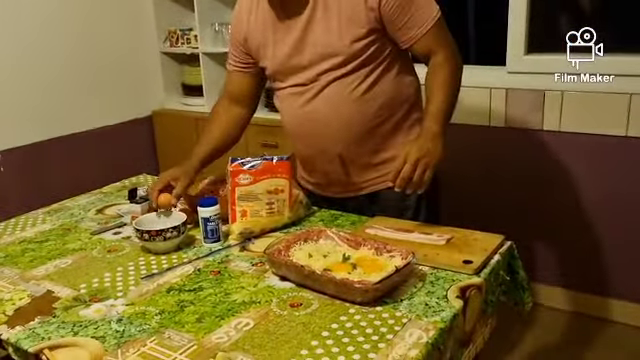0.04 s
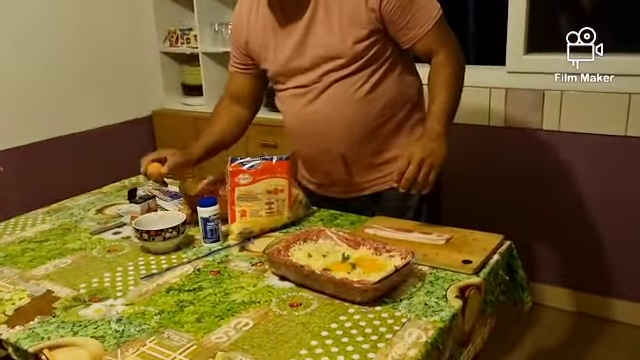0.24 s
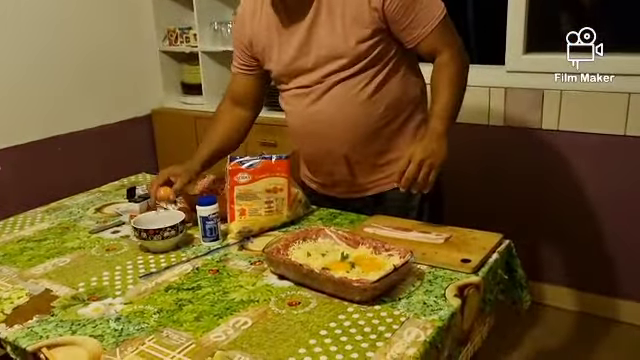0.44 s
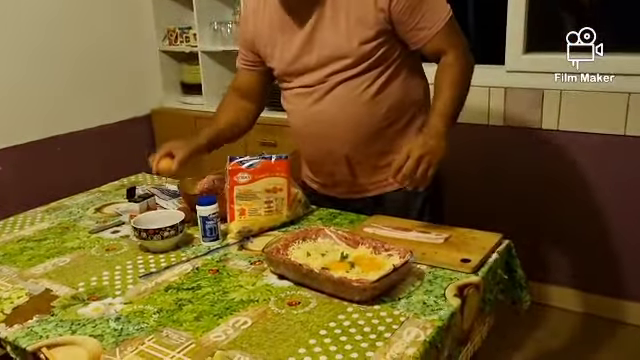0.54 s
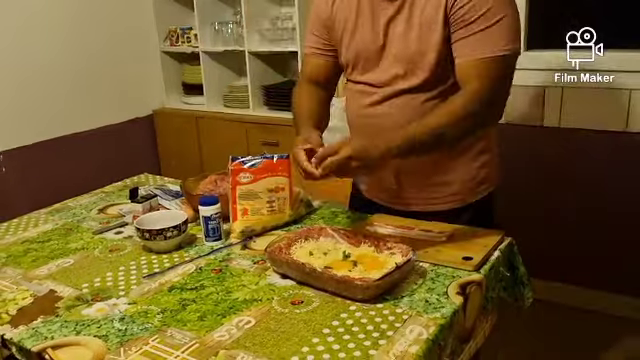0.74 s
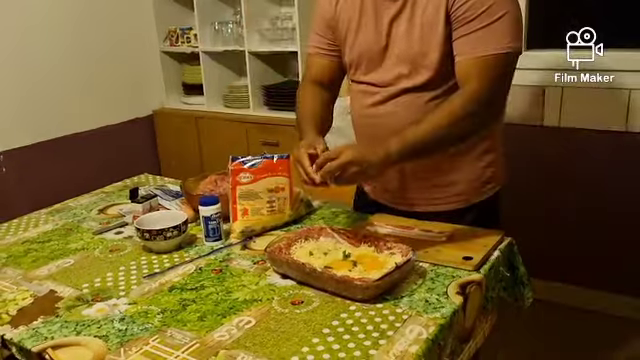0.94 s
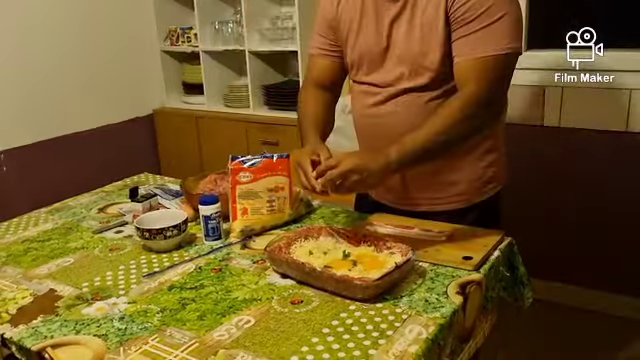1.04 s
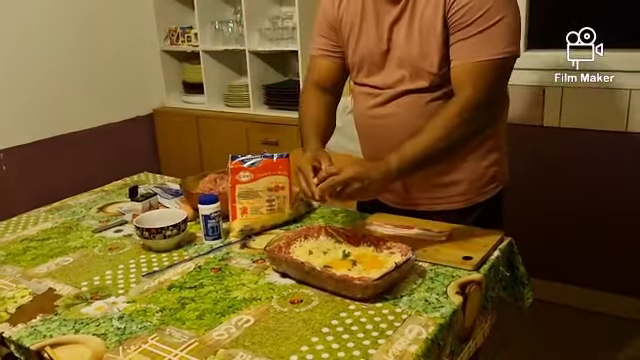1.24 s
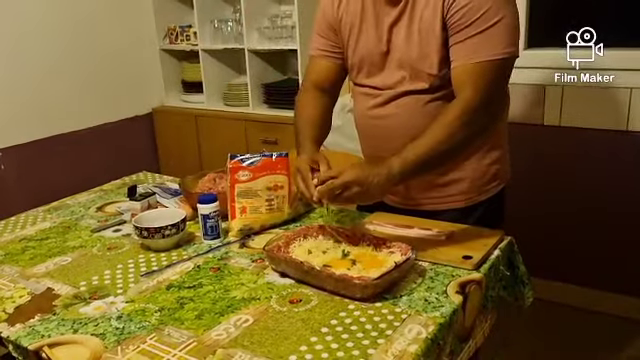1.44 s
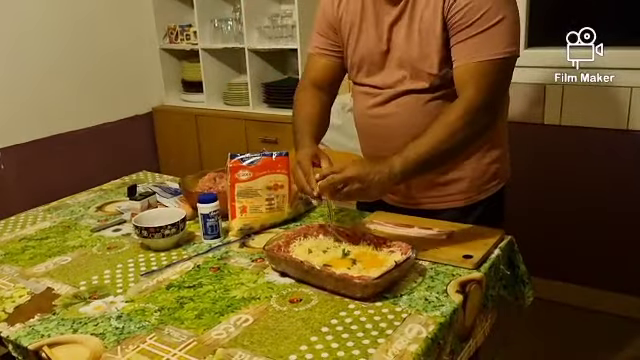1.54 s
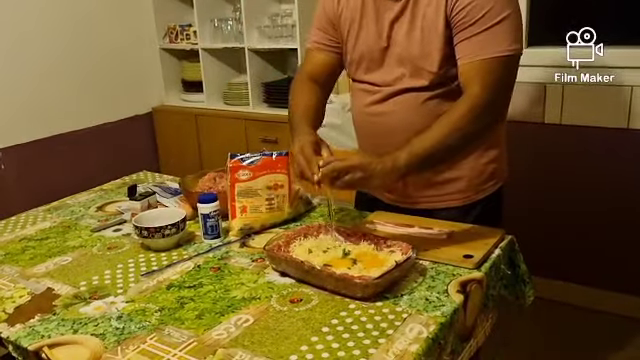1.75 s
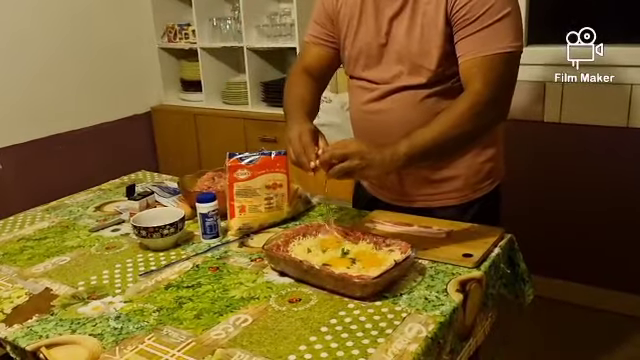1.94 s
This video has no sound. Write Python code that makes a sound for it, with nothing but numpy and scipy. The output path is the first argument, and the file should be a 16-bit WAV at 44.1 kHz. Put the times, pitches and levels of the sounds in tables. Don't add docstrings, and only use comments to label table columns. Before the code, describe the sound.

An egg knocks on a ceramic bowl at 0.2 s: crunchy shell crack, short bright bowl ring, low thud. The bowl drops back at 0.27 s and rocks softly until 0.35 s. Fingers snap the shell in a brittle cluster at 1.0-1.1 s, then sparsely at 1.3, 1.45-1.65 and 1.9 s. Faint bird chirps at 0.1 and 1.6 s; soft hum and hiss, lively kitchen echo, wide stereo.

```python
import sys
import numpy as np
from scipy import signal
from scipy.fft import rfft, irfft
from scipy.io import wavfile
from scipy.ndimage import uniform_filter1d

SR = 44100
rng = np.random.default_rng(int(sys.argv[2]) if len(sys.argv) > 2 else 0)


def pcm_store(signal):
    levels = np.round(np.clip(np.atleast_2d(signal), -1, 1) * 32767)
    wavfile.write(sys.argv[1], SR, levels.astype(np.int16).T)


def voltage_ratio(decibels):
    exponent = np.asarray(decibels, float) / 20
    return 10 ** exponent


N = 88200
T = np.arange(N) / SR
HZ = np.maximum(np.arange(N // 2 + 1) * SR / N, 1.)
LONG, SHORT = 32768, 4096

# f/Hz, level per Hz/dB
AIR_LOW_COLOUR = [(20, -12), (40, -17.5), (80, 2), (104, -7), (140, -16), (330, -7), (520, -8),
                  (1000, -12.5)]
AIR_HIGH_COLOUR = [(1000, 3.5), (1500, 3), (3300, -4.5), (4600, -7), (6200, -8), (7500, -19), (9000, -13),
                   (15000, -22)]
# f/Hz, level/dB, wander/dB
HUM_TONES = [(53.8, -62.5, 0), (67.5, -53.5, 0.5), (98.2, -61.5, 5), (188, -71.5, -3), (216.6, -74, 3.5),
             (299.6, -69.5, 4.5)]
# t/s, f/Hz, level/dB
CHIRP_SHAPE = [(0, 2990, -7), (0.031, 3060, 3), (0.061, 3260, 8), (.088, 3200, -5), (0.108, 3190, 2),
               (.15, 3200, -4), (.19, 3120, -16)]
# t/s, level/dB, pitch factor
CHIRP_TIMES = [
    (.115, -66.5, 1.025),
    (1.625, -60.5, 1.001),
]
# f/Hz, time to fall 60 dB/s
ROOM_ECHO = [(90, 0.12), (250, 0.29), (700, 0.45), (2000, 0.27), (5000, 0.37), (12000, 0.26)]
# f/Hz, share
SHARED_SOUND = [(60, 1), (250, 0.83), (600, 0.38), (1400, 0.41), (3000, 0.1), (12000, 0.083)]
# t/s, level/dB, f/Hz, ring time to fall 60 dB/ms, snap against ring/dB
SHELL_CRACKS = [(1.004, -57, 3740, 27, 7), (1.007, -57, 5060, 20, 7), (1.012, -40, 4340, 10, 7),
                (1.015, -35, 3270, 20, 2), (1.019, -43, 3250, 8.7, 2), (1.023, -34.5, 9270, 9.9, -5),
                (1.027, -57, 5500, 9.8, 4), (1.039, -49, 3370, 14, 9.5), (1.065, -40.5, 4850, 16, 2.5),
                (1.068, -40.5, 2770, 21, -1.5), (1.084, -59, 2840, 16, 3), (1.298, -53.5, 2200, 13, 6),
                (1.298, -53, 9050, 10, 8), (1.446, -44, 9230, 4.5, 5.5), (1.449, -48.5, 3460, 24, -9),
                (1.455, -49, 1636, 30, -11), (1.471, -44.5, 1647, 30, -6), (1.506, -46, 1680, 11, -5.5),
                (1.601, -36, 5830, 6.8, -4.5), (1.603, -40.5, 1620, 89, -15), (1.606, -43, 3130, 14, -12),
                (1.620, -42, 6280, 19, 0.5), (1.640, -45.5, 1780, 15, 2), (1.895, -49, 6760, 3.5, 10.5)]
# f/Hz, level per Hz/dB
SNAP_COLOUR = [(500, -1.5), (1500, 0.5), (3700, 3), (6200, -1.5), (7500, -6), (9200, -2), (11000, -6),
               (14500, -2.5)]
# f/Hz, level per Hz/dB
CRACK_COLOUR = [(250, -19), (750, -2.5), (1100, -9), (2400, -14.5), (3900, -10), (5200, -11.5),
                (7200, -18.5), (10800, -25), (13500, -17), (16000, -22.5)]
# f/Hz, level/dB, time to fall 60 dB/s
BOWL_TONES = [(1382.2, -0.5, 0.31), (1406, -9.5, .35), (3333, -7, 0.25), (3358, -12.5, 0.46),
              (5236, -15, 0.1), (5290, -14, 0.061), (7327, -25, 0.073), (8600, -15.5, 0.19),
              (11800, -24, .07), (12790, -22, .05), (13740, -20, .09), (15480, -25, .08),
              (1776, -3.5, 0.066), (1897, -12, .06)]
# f/Hz, level/dB, time to fall 60 dB/s
TABLE_TONES = [(73.9, -10.5, 0.31), (95, -14, 0.15), (165, -.5, 0.089), (223, -1.5, 0.093), (246, -2, 0.11),
               (281.5, -0.5, 0.1), (361, -1.5, 0.11), (443, -11.5, 0.085), (500, -4, 0.11),
               (633, -6.5, 0.086), (787, -1.5, 0.077), (960, -23, 0.033)]
# t/s, level/dB, push length/ms
BOWL_ROCKS = [
    (0.2748, -21.5, 1.42),
    (.286, -31, 1.22),
    (.302, -30.5, 6),
    (.321, -38.5, 1),
    (.332, -38, 1.6),
    (.347, -35.5, 1.11),
]


def curve(table, hz):
    table = np.array(table, float)
    return np.interp(np.log(hz), np.log(table[:, 0]), table[:, 1])


def unit(x):
    return x / np.sqrt(np.mean(x ** 2))


def fade(t60, size):
    return np.exp(-np.log(1000) * T[:size] / max(t60, 1e-3))


def ring(tones, size, turn=1):
    out = np.zeros(size)
    for k, (hz, db, t60) in enumerate(tones):
        out += turn ** k * voltage_ratio(db) * fade(t60, size) * np.sin(2 * np.pi * hz * T[:size])
    return out


def colour(x, gain_at):
    half = len(x) // 2
    gain = unit(gain_at(np.arange(1, half + 2) * SR / len(x)))
    cepstrum = irfft(np.log(gain))
    cepstrum[1:half] *= 2
    cepstrum[half + 1:] = 0
    return irfft(rfft(x) * np.exp(rfft(cepstrum)))


def walk(rate):
    hold = int(SR / rate)
    steps = np.repeat(rng.standard_normal(N // hold + 1), hold)
    smooth = uniform_filter1d(uniform_filter1d(steps, hold), hold)
    return 1.173 * smooth[:N]


def diffuse():
    share = np.clip(curve(SHARED_SOUND, HZ), 0, 1)
    both, left, right = rfft(rng.standard_normal((3, N)))
    return np.sqrt(share) * both + np.sqrt(1 - share) * np.array([left, right])


def add(out, start, x):
    k = int(start * SR)
    out[k:k + len(x)] += x[:N - k]


def air():
    noise = diffuse()
    low = irfft(noise * voltage_ratio(curve(AIR_LOW_COLOUR, HZ)) * (HZ < 1000), N)
    high = irfft(noise * voltage_ratio(curve(AIR_HIGH_COLOUR, HZ)) * (HZ >= 1000), N)
    low_level = voltage_ratio(-56.5 + 0.68 * walk(6.1))
    high_level = voltage_ratio(-59 + 0.79 * walk(2.06))
    return unit(low) * low_level + unit(high) * high_level


def hum():
    out = np.zeros(N)
    for hz, db, wander_db in HUM_TONES:
        level = voltage_ratio(db + wander_db * walk(6.72)) * np.sqrt(2)
        pitch = hz * (1 + 0.0135 * walk(4.984))
        out += level * np.sin(2 * np.pi * np.cumsum(pitch) / SR + 7 * rng.random())
    return out


def kitchen():
    rise_s, even_bins = 0.0013, 90
    noise, out = diffuse(), 0
    for octave in np.arange(5, 15):
        band = np.clip(1 - abs(np.log2(HZ) - octave), 0, 1)
        out = out + irfft(noise * band, N)[:, :LONG] * fade(curve(ROOM_ECHO, 2. ** octave), LONG)
    out = out * (1 - np.exp(-T[:LONG] / rise_s))
    spectrum = rfft(out)
    power = uniform_filter1d(uniform_filter1d(abs(spectrum) ** 2, even_bins), even_bins)
    return irfft(spectrum / np.sqrt(power))[:, :LONG // 2]


def bird():
    waver, flutter_db = .003, .8
    age, hz, db = np.array(CHIRP_SHAPE, float).T
    out = np.zeros(N)
    for start, top_db, factor in CHIRP_TIMES:
        pitch = factor * np.interp(T - start, age, hz) * (1 + waver * walk(80))
        level_db = top_db + np.interp(T - start, age, db, -90, -90) + flutter_db * walk(68.6)
        out += voltage_ratio(level_db) * np.sin(2 * np.pi * np.cumsum(pitch) / SR)
    return out


def shell():
    out = np.zeros(N)
    for start, db, hz, t60_ms, snap_db in SHELL_CRACKS:
        t60 = t60_ms / 1000
        tilt_db = 0.5 * np.log2(hz / 3000)
        burst = rng.standard_normal(SHORT) * fade(0.96 * t60, SHORT)
        snap = colour(burst, lambda f: voltage_ratio(curve(SNAP_COLOUR, f) + tilt_db * np.log2(f)))
        piece = ring([(hz, 0, t60), (hz * 1.09, -7, t60)], SHORT)
        add(out, start, voltage_ratio(db) * (piece + voltage_ratio(snap_db) * snap))
    return out


def shell_crush():
    grit = rng.standard_normal(LONG) * voltage_ratio(3.2 * walk(700)[:LONG])
    crack = rng.standard_normal(LONG) * fade(0.025, LONG)
    crush = voltage_ratio(-5) * grit * fade(0.13, LONG)
    return voltage_ratio(-20) * colour(crack + crush, lambda hz: voltage_ratio(curve(CRACK_COLOUR, hz)))


def table_thuds(knock_s):
    out = np.zeros(N)
    table_top = ring(TABLE_TONES, LONG, turn=-0.97)
    knock_push = (knock_s + 0.0018, -27, 1.2)  # t/s, level/dB, push length/ms
    for start, db, push_ms in [knock_push] + BOWL_ROCKS:
        push = np.hanning(int(push_ms * SR / 1000) + 3)
        add(out, start, voltage_ratio(db) * np.convolve(table_top, push / push.sum()))
    return out


def knock():
    knock_s = .2105
    out = np.zeros((2, N))
    crush = shell_crush()
    bowl_ring = voltage_ratio(-26) * ring(BOWL_TONES, LONG)
    for side, lead_s in zip(out, (0, .00025)):
        add(side, knock_s, crush)
        add(side, knock_s - lead_s, bowl_ring)
    return out, table_thuds(knock_s)


def scene():
    right_lag_s, left_db, room_db = 0.000375, -2.5, 1
    (bowl, thuds), cracks, chirps = knock(), shell(), bird()
    into_room = bowl[0] + voltage_ratio(-3.5) * thuds + voltage_ratio(2) * cracks + chirps
    echo = signal.fftconvolve(into_room[None], kitchen(), axes=1)[:, :N]
    left, right = bowl + thuds + cracks + chirps + voltage_ratio(room_db) * echo + hum() + air()
    late = irfft(rfft(right) * np.exp(-2j * np.pi * HZ * right_lag_s), N)
    return np.array([left * voltage_ratio(left_db / 2), late * voltage_ratio(-left_db / 2)])


def roll_off(x):
    return signal.sosfilt(signal.butter(12, 16820, fs=SR, output="sos"), x)


def record(dry):
    low_pass = signal.butter(10, 15900, fs=SR, output="sos")
    mix = signal.sosfilt(low_pass, dry)
    return roll_off(mix)


dry = scene()
out = record(dry)
pcm_store(out)
```